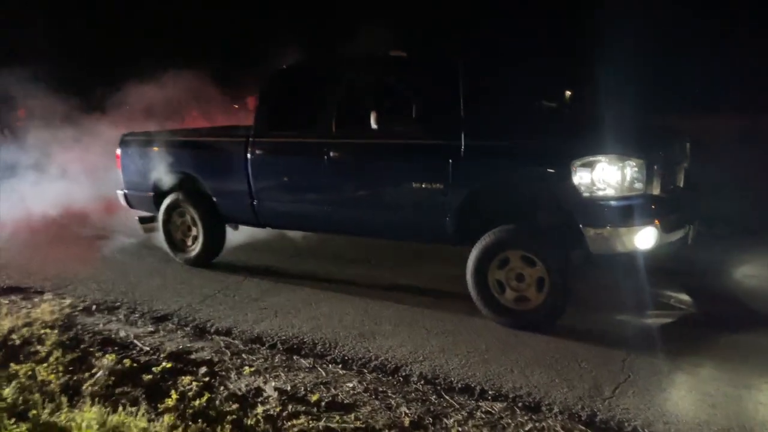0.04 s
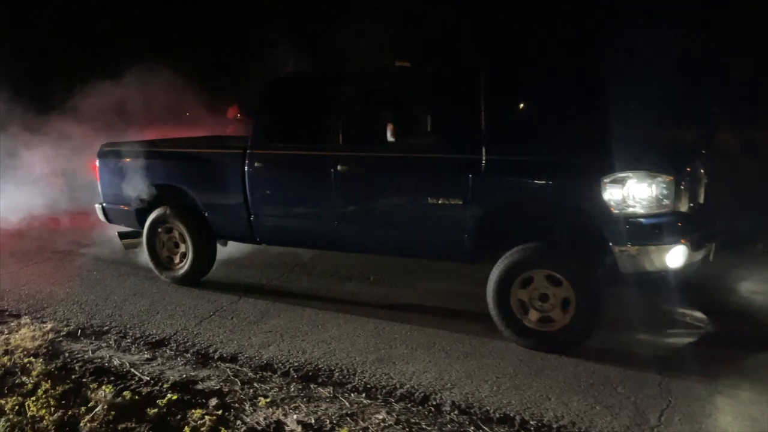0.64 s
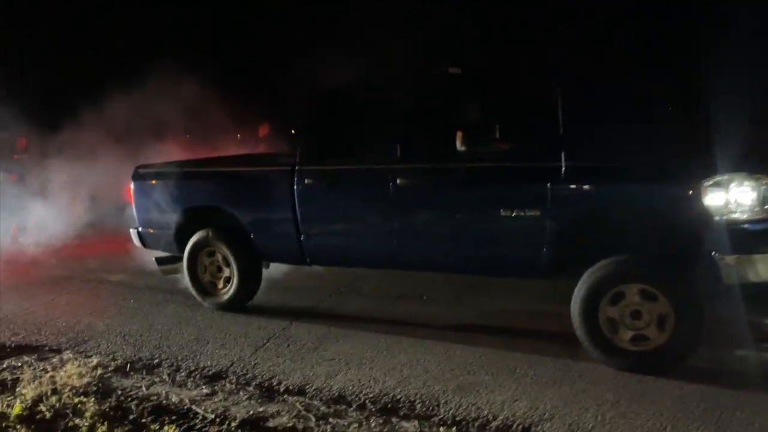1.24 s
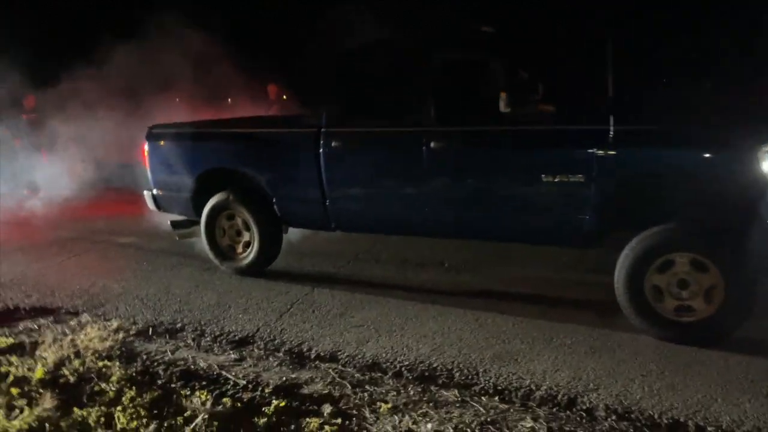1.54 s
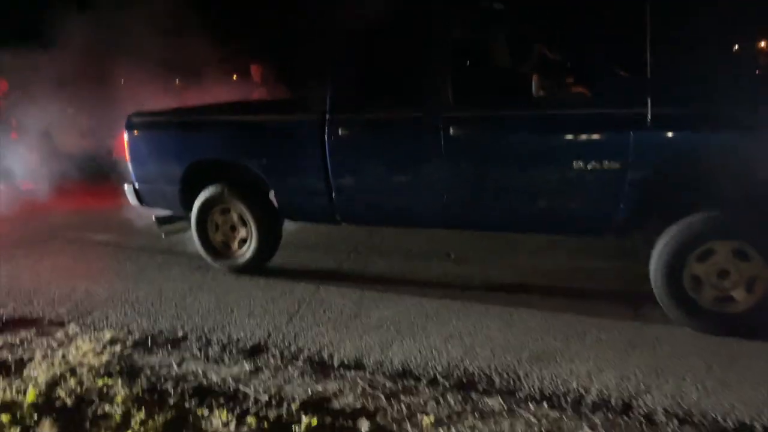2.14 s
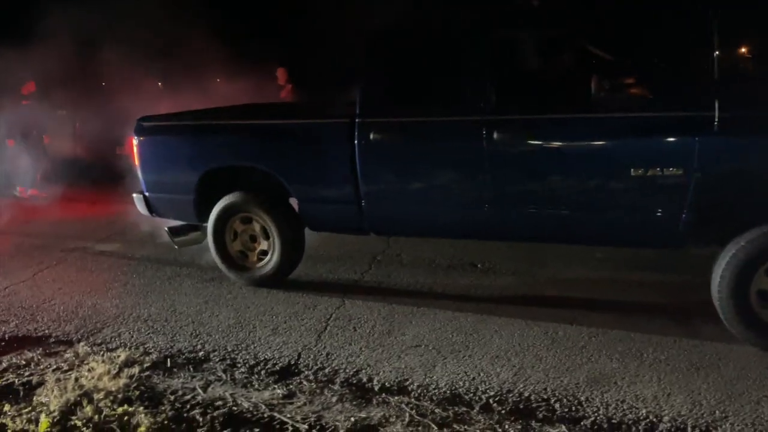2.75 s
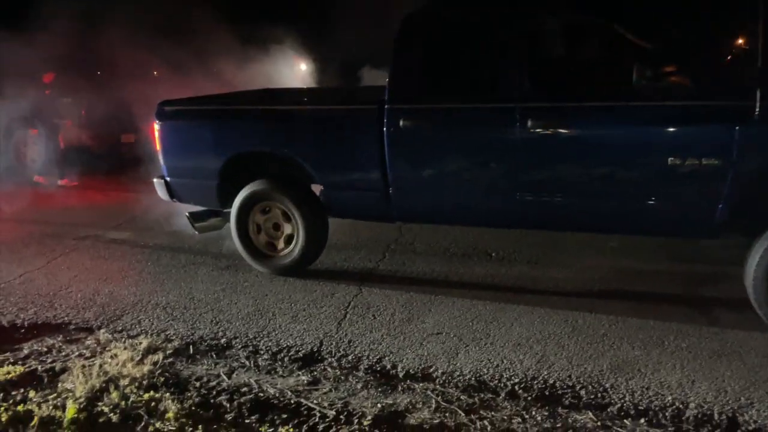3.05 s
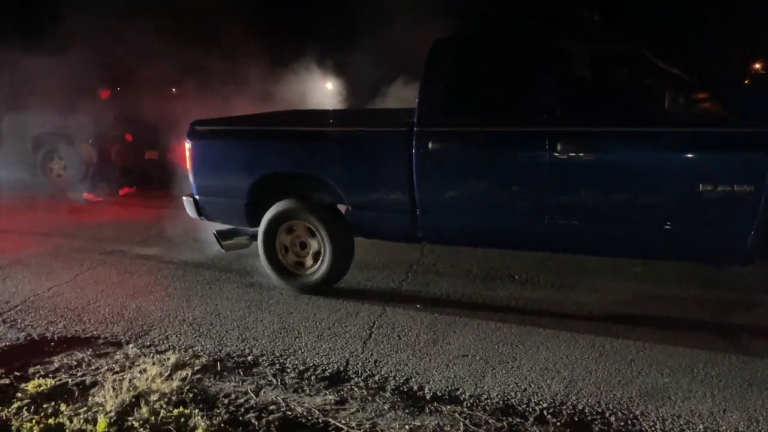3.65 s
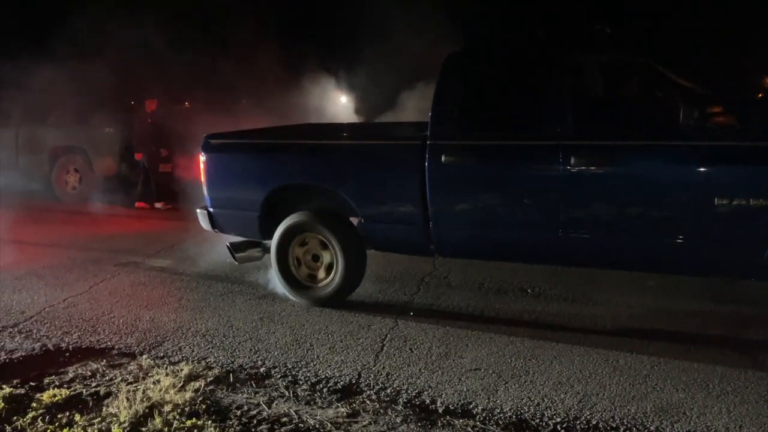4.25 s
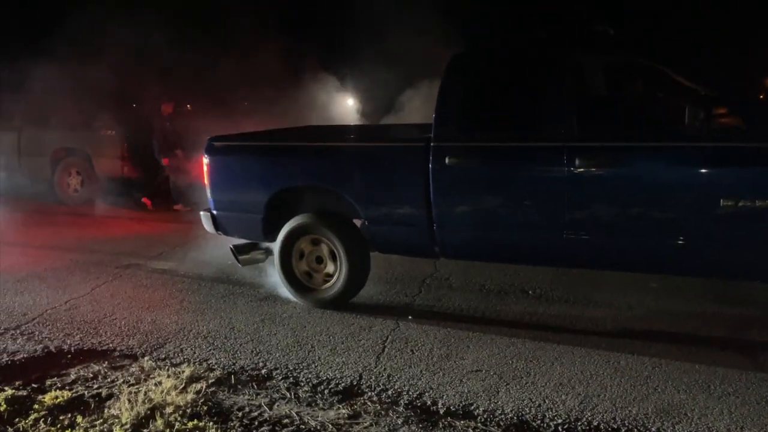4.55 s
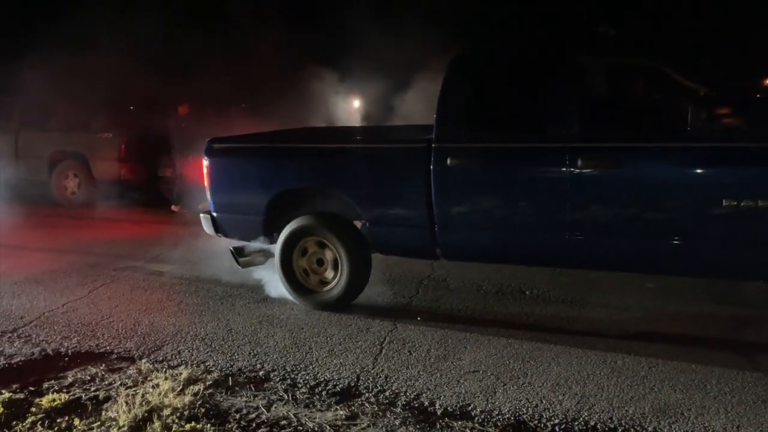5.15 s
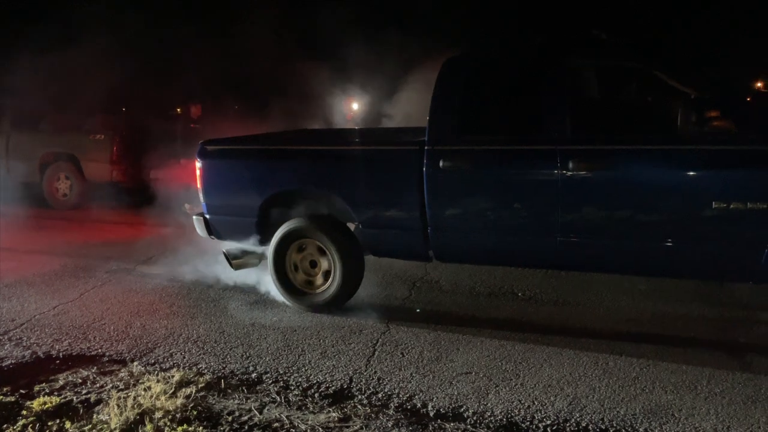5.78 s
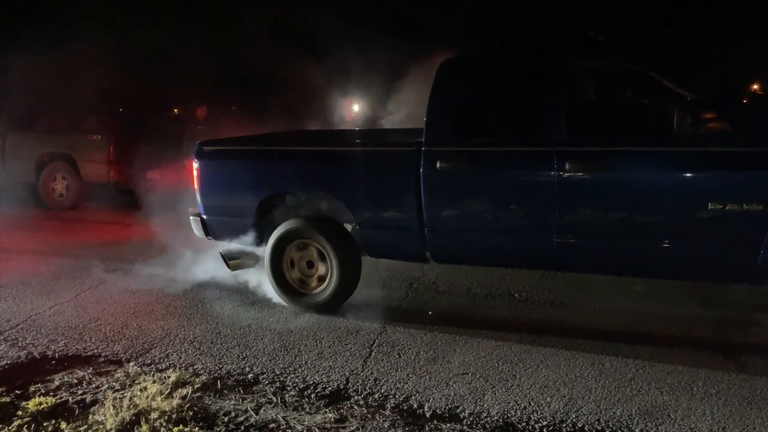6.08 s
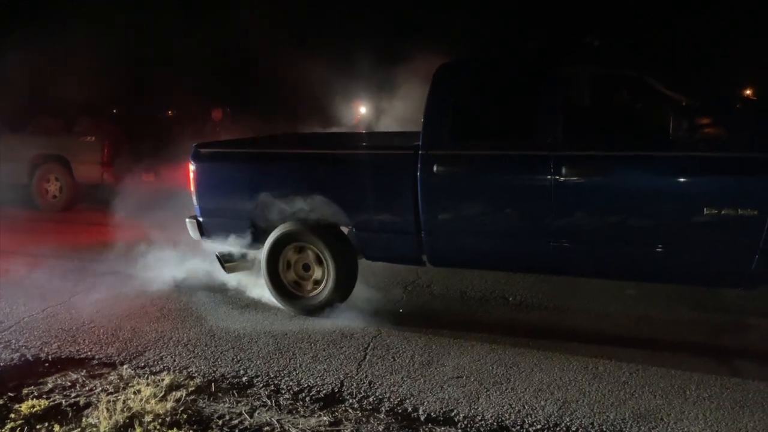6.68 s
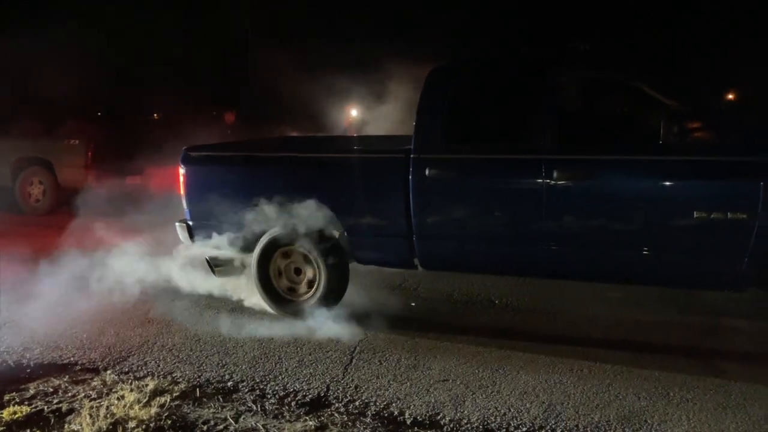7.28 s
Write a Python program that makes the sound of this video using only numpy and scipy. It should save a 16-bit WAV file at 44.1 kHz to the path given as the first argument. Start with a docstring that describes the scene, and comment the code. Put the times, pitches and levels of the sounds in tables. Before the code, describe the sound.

After a low idle, a pickup's engine is floored, climbing to a droning, rasping roar over the hiss of a spinning tyre.

```python
"""V8 pickup spinning a tyre

The engine idles on an asphalt road at night, then is floored and spins a rear tyre in place.
The exhaust drones on the orders (harmonics) of its eight-firing cycle; under load the strongest
firings steepen into cracks. Gas rushes from the tailpipe, the intake whistles, grit crunches,
the tyre hisses, and the road and verge send back short echoes."""
import sys
import numpy as np
from scipy import signal
from scipy.fft import rfft, irfft, next_fast_len
from scipy.io import wavfile
from scipy.ndimage import uniform_filter1d

SR = 44100
rng = np.random.default_rng(int(sys.argv[2]) if len(sys.argv) > 2 else 0)


def to_wav(sig):
    """Store sig (one row per channel, or 1-D mono) as 16-bit WAV at the path in sys.argv[1].

    Samples outside -1..1 are clipped; the rate is SR.
    """
    pcm = np.clip(np.atleast_2d(sig), -1, 1) * 32767
    pcm = np.round(pcm).astype(np.int16)
    wavfile.write(sys.argv[1], SR, pcm.T)  # frames by channels


N = 322812
TIME = np.arange(N) / SR

FLOORED_S = 2.32  # the pedal goes down and stays down
FIRST_FIRING = .025  # cycles
ROUGH_START, ROUGH_SETTLED, SETTLE_S = 1, 0.068, 0.47  # combustion roughness, 0-1

# Relative spectral densities: f/Hz, level/dB
NIGHT_SPECTRUM = [(40, 0), (80, -2.5), (165, -2), (262, -5.5), (385, -21.5), (650, -19), (850, -30),
                  (1300, -29), (2000, -34), (3000, -37.5), (6000, -42.5), (10000, -46), (14000, -57)]  # night ambience
GRIT_SPECTRUM = [(400, 2.5), (700, -3.5), (1000, -5), (1500, -11), (2100, -14), (3000, -17), (5000, -22),
                 (9500, -32), (13000, -34)]  # crunching grit
TYRE_SPECTRUM = [(2200, 6), (3000, -6), (3550, -0.5), (4050, -5), (4900, -2.5), (5600, -8), (6100, -3.5),
                 (7500, -9), (8400, -13), (9300, -3.5), (10100, -10.5), (11800, -18.5), (13500, -25)]  # rubber sliding on asphalt
THUD_SPECTRUM = [(35, -5), (55, 2), (80, -6), (113, -0.5), (173, -2.5), (268, -16), (389, -19), (650, -44),
                 (900, -76)]  # a firing at idle
GAS_SPECTRUM = [(300, -14.5), (620, -2), (760, -8.5), (1000, 0.5), (1250, -5), (1850, -4.5), (2300, -22.5),
                (3000, -18.5), (6000, -37.5)]  # flow from the tailpipe
CRACK_SPECTRUM = [(500, 1.5), (740, -17.5), (815, 7.5), (870, 4), (945, 15.5), (1090, 11), (1170, 4.5),
                  (1480, 7.5), (1850, 11), (2100, -3), (2400, 0), (2900, -33.5), (3500, 0), (4100, -50.5),
                  (9000, -54)]  # body of a crack
SPIT_SPECTRUM = [(2300, 7), (3050, -5), (3520, 18), (4200, 6), (5000, 2.5), (7500, -20.5), (9300, -1.5),
                 (10500, -29), (13500, -24.5)]  # bright edge of a crack
BURBLE_SPECTRUM = [(30, -18), (60, -26.5), (130, -15.5), (250, -2), (420, 5), (610, 3), (750, -24)]  # turbulence on the exhaust pulses
# A pebble snaps under the tyre: t/s, level/dB
PEBBLE_SNAPS = [(1.532, -61)]
# Loose grit gives way: t/s, decay time/s, crunch level/dB, ring f/Hz, ring level/dB
GRIT_CRUNCHES = [(1.272, 0.028, -61, 720, -59), (1.309, 0.044, -58, 3700, -73),
                 (1.352, 0.06, -67, 2110, -69), (1.384, .045, -67, 1830, -67), (1.544, .04, -79, 1050, -67),
                 (1.735, .03, -69, 2900, -80), (1.767, .045, -65, 2400, -77)]
# Whistle of the intake: t/s, f/Hz, level/dB
INTAKE_WHISTLE = [(2.42, 3800, -69), (2.55, 3950, -58), (2.8, 4187, -50.5), (3.1, 4390, -49.5),
                  (3.35, 4800, -43), (3.6, 4925, -49.5), (3.9, 5090, -46.5), (4.6, 5050, -49),
                  (7.32, 5190, -54.5)]
# Engine speed in four-stroke cycles: t/s, f/Hz
CYCLE_RATE = [(0.0, 9.476), (1.0, 8.585), (2.3, 8.05), (2.6, 11.91), (2.9, 16.104), (3.2, 19.259),
              (3.52, 19.351), (4.2, 20.669), (4.72, 21.678), (5.35, 22.138), (5.9, 22.924), (6.5, 24.055),
              (7.32, 26.65)]
# The tyre grips and slips: centre t/s, duration/s, drone level/dB, brightness/dB, gas level/dB
LOAD_SWELLS = [(2.827, 0.09, 7, -3, 2.5), (2.944, 0.13, 4, 2.5, 5), (2.56, 0.078, 1.5, 1, 4),
               (3.079, 0.038, 5, -3, -2.5), (3.336, 0.57, -0.5, 2, 4.5), (4.56, 0.71, -0.6, 2, 5),
               (5.304, 1, -2, 2, 0), (6.833, 0.26, -1.3, 1.05, 2)]
# One firing steepens into a shock: start t/s, end t/s, firing (0-7), crack level/dB, spit level/dB
SHOCKS = [(3.147, 4.322, 1, -8.5, -27), (3.153, 3.7, 4, -3.5, -29), (3.3, 4.7, 6, -3.5, -31),
          (4.314, 4.856, 1, 5, -3.5), (4.405, 5.104, 4, 7.5, 9.5), (4.853, 5.396, 1, 3.5, -15),
          (5.1, 5.805, 4, 6, 13), (5.4, 6.24, 1, 3, 4), (5.796, 7.063, 4, -0.5, -5.5),
          (6.57, 7.014, 1, 4, 12)]
# Single cracks that stand out: t/s, level/dB
LOUD_POPS = [(5.4665, -5.5), (5.4948, -10.5), (5.7335, -8), (6.8538, -9.5)]
# The silencer booms as the revs leap: centre t/s, duration/s, level/dB
SILENCER_BOOMS = [(2.56, 0.11, -15.5), (2.745, 0.14, -14.5)]
# The eight firings of a cycle, whose pattern sets the phases of the orders: level/dB
FIRING_LEVELS = [-7.5, -.5, -8, -7, -.5, -7, -5, -9]
# Harmonics of the cycle rate: order, level/dB at 22 cycles per second, slope with rate/(dB/Hz)
ORDERS = [(3, 5.5, 0.57), (5, 1.9, 0.45), (6, -9, -2.2), (7, -15, -4), (8, 8, 0.39), (9, -11.5, -1),
          (10, -5.5, -2.4), (11, -2.5, 0.8), (12, -20, -0.3), (13, -1.5, 2), (14, -8, -1.9), (15, -20, 2.9),
          (16, -1.4, -1.18), (17, -15.3, 0.8), (18, -14.5, 1.85), (19, -1.05, 0.34), (20, -16.3, 1.5),
          (21, -1.5, 0.46), (22, -9, -0.1), (23, -19.5, 3.6), (24, -8.5, -1.2), (25, -17.5, 0.3),
          (26, -15.5, 2.5), (27, -8.5, -0.5), (29, -10, -0.06), (30, -11.5, 4.5), (32, -7, 2.5),
          (37, -5.5, 3.5), (43, 7, 2.7)]
# Gain of the weak orders, which arise from unequal firing: t/s, level/dB
WEAK_ORDER_GAIN = [(3, -4), (3.4, -3.8), (3.8, -4), (4.65, 1), (4.85, -3), (5.65, -1.5), (5.85, 0),
                   (6.75, 5), (7.05, 1.5)]
# Frequency response of the exhaust pipe: f/Hz, level/dB
PIPE_RESPONSE = [(40, -31), (60, -6), (83, -5.5), (120, -0.35), (170, -2.5), (255, 2), (285, -6.5),
                 (310, 1.5), (335, 4.5), (372, 0.75), (408, 7.5), (435, 2), (468, 5.5), (500, 0.4),
                 (570, 3.5), (650, -0.1), (720, -25)]


def from_db(db):
    """Amplitude ratio of a level in decibels."""
    return 10 ** (np.asarray(db) / 20)


def unit_power(x):
    """Normalisation to a mean square of 1."""
    return x / np.sqrt(np.mean(x ** 2) + 1e-20)


def in_time(rows):
    """Linear interpolation of each column at every sample."""
    times, *columns = np.transpose(rows)
    return [np.interp(TIME, times, column) for column in columns]


def level_at(spectrum, hz):
    """Interpolation of a spectrum on a logarithmic frequency axis."""
    f, db = np.transpose(spectrum)
    return np.interp(np.log(np.maximum(hz, 1)), np.log(f), db)


def drift(rate_hz):
    """Random modulation of unit power: straight lines between Gaussian values."""
    steps = rng.standard_normal(4000)
    return unit_power(np.interp(TIME * rate_hz, np.arange(len(steps)), steps))


def swell(centre_s, length_s):
    """Gaussian envelope of height 1."""
    return np.exp(-np.minimum((2 * (TIME - centre_s) / length_s) ** 2, 50))


def since_floored():
    """Seconds elapsed since the throttle opened."""
    return np.maximum(TIME - FLOORED_S, 0)


def opening(depth_db, rise_s, shape=0.62):
    """Relaxation from -depth_db to 0 dB as the engine takes up the throttle."""
    return -depth_db * np.exp(-(since_floored() / rise_s) ** shape)


def colour(x, spectrum, size=8192):
    """Minimum-phase filtering, falling 20 dB per octave beyond the ends of the spectrum."""
    hz = np.maximum(np.fft.rfftfreq(size, 1 / SR), 1)
    octaves_below = np.maximum(np.log2(spectrum[0][0] / hz), 0)
    octaves_above = np.maximum(np.log2(hz / spectrum[-1][0]), 0)
    cepstrum = irfft(np.log(from_db(level_at(spectrum, hz) - 20 * (octaves_below + octaves_above))))
    # Folding the cepstrum makes the response causal.
    cepstrum[1:size // 2] *= 2
    cepstrum[size // 2 + 1:] = 0
    return signal.oaconvolve(x, irfft(np.exp(rfft(cepstrum))))[:N]


def noise(spectrum):
    """Filtered Gaussian noise of unit power."""
    return unit_power(colour(rng.standard_normal(N), spectrum))


def narrow_band(hz, half_width_hz):
    """Modulation shifts low-pass noise into a band around a moving centre frequency."""
    band = signal.sosfilt(signal.butter(2, half_width_hz, fs=SR, output="sos"), rng.standard_normal(N))
    return unit_power(band * np.cos(2 * np.pi * np.cumsum(hz) / SR))


def pulses(at, db):
    """Impulse train with the given sample positions and levels."""
    out = np.zeros(N)
    out[at] = from_db(db)
    return out


def burst_after(clicks, decay_s):
    """Exponentially decaying noise behind each impulse, of equal energy on average."""
    pole = np.exp(-1 / (decay_s * SR))
    return signal.lfilter([np.sqrt(1 - pole ** 2)], [1, -pole], clicks + 1e-18) * rng.standard_normal(N)


def delayed(x, ms):
    """Linear phase gives a delay of any fraction of a sample."""
    size = next_fast_len(N + SR // 4)
    turns = np.fft.rfftfreq(size, 1 / SR) * ms / 1000
    return irfft(rfft(x, size) * np.exp(-2j * np.pi * turns), size)[:N]


def dispersed(x, lead_ms=0.913, spread_ms=5, knee_hz=950):
    """Dispersion: treble runs ahead and bass trails, so each crack falls in pitch."""
    size = next_fast_len(N + SR // 4)
    hz = np.fft.rfftfreq(size, 1 / SR)
    turns = (spread_ms * knee_hz * (1 - np.exp(-hz / knee_hz)) - lead_ms * hz) / 1000
    return irfft(rfft(x, size) * np.exp(-2j * np.pi * turns), size)[:N]


def place(x, pan_db, right_lag_ms):
    """Stereo position by differences of level (left minus right) and arrival time."""
    return np.array([x * from_db(pan_db / 2), delayed(x, right_lag_ms) * from_db(-pan_db / 2)])


def grainy_field(spectrum, grain_db, diffuse, lag_ms):
    """Randomly modulated noise: a direct wave plus a diffuse field, uncorrelated between channels."""
    grains = [rng.standard_normal(N) * from_db(grain_db * drift(400)) for _ in range(3)]
    direct, *scattered = [unit_power(colour(x, spectrum)) for x in grains]
    return place(direct, pan_db=-3.5, right_lag_ms=lag_ms) + diffuse * np.array(scattered)


def night():
    """Ambient noise: a faint, partly diffuse rumble."""
    return from_db(-55) * grainy_field(NIGHT_SPECTRUM, grain_db=2.0, diffuse=0.64, lag_ms=-0.065)


def pebble(t60_s=0.022):
    """A snapping stone is a damped transient: one short, bright tick."""
    envelope = sum(from_db(db - 60 * np.maximum(TIME - s, 0) / t60_s) * (TIME > s)
                   for s, db in PEBBLE_SNAPS)
    return envelope * noise([(5000, -20), (10000, 0), (13500, -12)])


def crunches(attack_s=.012, fall_octaves_per_s=4):
    """Grit yields quickly and decays exponentially, each time with a narrow ring that slides down."""
    grit = grainy_field(GRIT_SPECTRUM, grain_db=1.0, diffuse=0.89, lag_ms=0.11)
    out = 0
    for s, decay_s, db, hz, ring_db in GRIT_CRUNCHES:
        age = np.clip(TIME - s, 0, 1)
        envelope = np.where(TIME < s, swell(s, 2 * attack_s), np.exp(-age / decay_s))
        ring = narrow_band(hz * 2 ** (-fall_octaves_per_s * age), half_width_hz=140)
        out = out + envelope * (from_db(db) * grit + from_db(ring_db) * ring)
    return out


def tyre():
    """Sliding friction on asphalt hisses, most fiercely as the tyre breaks loose."""
    breakaway_db = 3.5 * swell(3.36, 0.9)
    db = -45 + opening(depth_db=46.5, rise_s=0.15, shape=0.97) + breakaway_db
    return from_db(db) * grainy_field(TYRE_SPECTRUM, grain_db=3.0, diffuse=0.84, lag_ms=0.2504)


def intake():
    """Flow noise: a whistling band climbs and broadens into a hiss as the engine draws harder."""
    hz, db = in_time(INTAKE_WHISTLE)
    whistle = narrow_band(hz, half_width_hz=160)
    hiss = narrow_band(hz, half_width_hz=370)
    hiss_share = np.interp(TIME, [2.85, 3.3], [0, 1])
    return from_db(db) * (np.sqrt(1 - hiss_share) * whistle + np.sqrt(hiss_share) * hiss)


def verge(x, t60_s=0.023, gap_s=.004, echo_db=-10.5):
    """Scattering from grass and nearby vehicles returns a short, diffuse echo."""
    t = TIME[:SR // 3]
    tails = rng.standard_normal((2, len(t))) * from_db(-60 * t / t60_s) * (t > gap_s)
    return from_db(echo_db) * np.array([signal.oaconvolve(x, h / np.linalg.norm(h))[:N] for h in tails])


def firings(cycle):
    """Eight firings evenly divide the four-stroke cycle: the sample and number (0-7) of each."""
    count = np.floor((cycle - FIRST_FIRING) * len(FIRING_LEVELS)).astype(int)
    at = np.flatnonzero(np.diff(count)) + 1
    return at, count[at] % len(FIRING_LEVELS)


def idle_tones(cycle, order=12, whine_hz=2005):
    """Pure tones while the idle is high: one order hums in the silencer and an accessory whines."""
    hum = from_db(-52) * swell(0.12, 1.0) * np.sin(2 * np.pi * order * cycle)
    whine = from_db(-79) * swell(.05, 0.74) * np.sin(2 * np.pi * whine_hz * TIME)
    return hum + whine


def idle(cycle, uneven_db=3, far_bank_db=-15, hunt_db=3.5, hunt_period_s=1.94):
    """Impulse excitation: every second firing thuds through the silencer; the level hunts slowly."""
    at, firing = firings(cycle)
    clicks = pulses(at, far_bank_db * (firing % 2 == 0) + uneven_db * rng.standard_normal(len(at)))
    thuds = colour(delayed(clicks, ms=4), THUD_SPECTRUM)
    local_power = uniform_filter1d(uniform_filter1d(thuds ** 2, SR // 7), SR // 7)
    level_db = -52.5 + hunt_db * np.cos(2 * np.pi * TIME / hunt_period_s)
    return from_db(level_db) * thuds / np.sqrt(np.abs(local_power) + 1e-12)


def load(sag_db_per_s=0.876):
    """Engine load sets drone gain, brightness and gas gain (dB): first throttle, then tyre grip."""
    drone_db, bright_db, gas_db = sum(np.outer(changes, swell(s, length))
                                      for s, length, *changes in LOAD_SWELLS)
    drone_db += -20 + opening(depth_db=34.0, rise_s=0.12) - sag_db_per_s * since_floored()
    bright_db += opening(depth_db=13.5, rise_s=0.29, shape=1.8)
    gas_db += -31 + opening(depth_db=52.5, rise_s=0.26, shape=0.94) + 0.03 * since_floored()
    return drone_db, bright_db, gas_db


def lope(cycle):
    """Modulation (dB) at the cycle rate while one firing briefly dominates."""
    return 1.9 * swell(4.0, 1.1) * np.cos(2 * np.pi * (cycle - .2))


def gas(cycle, rough, puff_db=3, size=2048):
    """Pulsating flow, a puff per firing: turbulent in a ragged burn, then largely periodic."""
    wavelets = np.interp(cycle, np.arange(size) / size, rng.standard_normal(size), period=1)
    periodic = unit_power(colour(wavelets, GAS_SPECTRUM))
    turbulence = 8 * rough
    flow = (periodic + turbulence * noise(GAS_SPECTRUM)) / np.hypot(1, turbulence)
    puffs = from_db(puff_db * np.cos(2 * np.pi * (len(FIRING_LEVELS) * cycle - .45)))
    return unit_power(flow * puffs)


def shock_fronts(cycle, spells, uneven_db, weak_db, fade_s=.07):
    """Nonlinear steepening: an impulse per firing, reinforced during that firing's spells."""
    at, firing = firings(cycle)
    gain = from_db(weak_db + opening(depth_db=50.5, rise_s=0.4)[at])
    for start, end, steep_firing, db in spells:
        inside = (np.tanh((TIME[at] - start) / fade_s) - np.tanh((TIME[at] - end) / fade_s)) / 2
        gain = gain + from_db(db) * inside * (firing == steep_firing)
    return pulses(at, 20 * np.log10(gain) + uneven_db * rng.standard_normal(len(at)))


def cracks(cycle, level_db=-30.5):
    """Shock fronts leave the tailpipe, tear the air behind them and reflect from the road."""
    spells = [(start, end, firing, db) for start, end, firing, db, _ in SHOCKS]
    fronts = shock_fronts(cycle, spells, uneven_db=.8, weak_db=-15)
    tearing = .22 * burst_after(fronts, decay_s=.002)
    road_echo = 0.12 * delayed(fronts, ms=1.42)
    return from_db(level_db) * unit_power(colour(dispersed(fronts + tearing + road_echo), CRACK_SPECTRUM))


def spit(cycle, level_db=-45):
    """The treble of each shock front: a sharp snap and a brief, random burst of gas."""
    spells = [(start, end, firing, db) for start, end, firing, _, db in SHOCKS]
    fronts = shock_fronts(cycle, spells, uneven_db=3, weak_db=-32)
    snaps = .55 * fronts + burst_after(fronts, decay_s=0.0013)
    return from_db(level_db) * unit_power(colour(dispersed(snaps), SPIT_SPECTRUM))


def pops():
    """The hardest cracks excite the resonances of the tailpipe's tip."""
    times, db = np.transpose(LOUD_POPS)
    snaps = pulses((times * SR).astype(int), db)
    return colour(snaps + 1.6 * burst_after(snaps, decay_s=0.00095), SPIT_SPECTRUM)


def boom(cycle, order=5):
    """Cavity resonance: a low order swells in the silencer as the revs leap."""
    envelope = sum(from_db(db) * swell(s, length) for s, length, db in SILENCER_BOOMS)
    return envelope * np.sin(2 * np.pi * order * cycle)


def burble(tones, rough):
    """Turbulence rides on the pressure pulses and fills the gaps between the spectral lines."""
    pressure = np.sqrt(np.abs(uniform_filter1d(tones ** 2, size=500)))
    gain = from_db(-7 + opening(depth_db=16.0, rise_s=0.23, shape=2.9))
    return gain * (rough + .035) * pressure * noise(BURBLE_SPECTRUM)


def slack(hz, at_s=6.87, fade_s=0.27, depth_db=9, above_hz=338):
    """Attenuation (dB) of the upper orders as the load slackens near the end."""
    slackened = (1 + np.tanh((TIME - at_s) / fade_s)) / 2
    upper = (1 + np.tanh((hz - above_hz) / 20)) / 2
    return depth_db * slackened * upper


def pipe_phase(hz, bass_hz=455, round_trip_s=.0066, reflection=-.62):
    """Phase shift (rad): the silencer delays the bass, resonances ring, the open end inverts an echo."""
    silencer = 14.5 * np.exp(-hz / bass_hz)
    resonances = .09 * (level_at(PIPE_RESPONSE, hz * 1.04) - level_at(PIPE_RESPONSE, hz / 1.04))
    open_end = np.angle(1 + reflection * np.exp(-2j * np.pi * hz * round_trip_s))
    return silencer + resonances + open_end


def drone(cycle_hz, cycle, rough, load_db, bright_db, knee_hz=300, pipe_delay_s=.0011):
    """Periodic firing gives a harmonic series, filtered by the pipe and modulated by rough burning."""
    firing_phases = np.angle(np.fft.fft(from_db(FIRING_LEVELS)))
    arrival = cycle - FIRST_FIRING - cycle_hz * pipe_delay_s
    imbalance_db, = in_time(WEAK_ORDER_GAIN)
    rate_offset_hz = np.maximum(cycle_hz, 19) - 22
    tones = np.zeros(N)
    for order, db, db_per_hz in ORDERS:
        hz = order * cycle_hz
        weak = order % 8 not in (0, 3, 5)
        db = db + db_per_hz * rate_offset_hz + weak * imbalance_db
        db += 1.5 * np.minimum(hz / 455, 1) ** 2 * drift(6.3)  # tyre slip sways the upper orders
        db -= 6 * max(order - 30, 0) * (rough - ROUGH_SETTLED)  # the highest need a settled burn
        db += level_at(PIPE_RESPONSE, hz) - slack(hz)
        db += bright_db * np.log2(1 + (hz / knee_hz) ** 2)
        shake = rough * np.minimum(hz / knee_hz, 1.5) * drift(30)
        phase = 2 * np.pi * order * arrival + firing_phases[order % 8] + pipe_phase(hz)
        tones += from_db(db) * (1 + .5 * shake) * np.cos(phase + 1.7 * shake)
    # While the burn is ragged, whole firings come out strong or weak.
    tones *= from_db(load_db + 2.5 * rough * drift(110))
    return tones + burble(tones, rough)


def scene():
    """Superposition: one crank phase times the exhaust, over intake, tyre, grit and night air."""
    cycle_hz, = in_time(CYCLE_RATE)
    cycle = np.cumsum(cycle_hz) / SR + .004 * drift(6)  # the crank runs a little ahead and behind
    drone_db, bright_db, gas_db = load()
    lope_db = lope(cycle)
    rough = ROUGH_SETTLED + (ROUGH_START - ROUGH_SETTLED) * np.exp(-since_floored() / SETTLE_S)
    throttle = np.clip(since_floored() / 0.02, 0, 1)
    idling = 1 - np.clip(since_floored() / 0.32, 0, 1)
    rushing = np.clip((since_floored() - 0.089) / 0.12, 0, 1)  # air and tyre set in a moment later

    low = throttle * (drone(cycle_hz, cycle, rough, drone_db, bright_db + lope_db) + boom(cycle))
    low += idling * (idle(cycle) + idle_tones(cycle))
    flow = from_db(gas_db + 2 * lope_db) * gas(cycle, rough)
    rasp = throttle * (flow + cracks(cycle) + spit(cycle) + pops())
    exhaust = place(low, pan_db=-3.5, right_lag_ms=-0.12)
    exhaust += place(rasp, pan_db=-3.0, right_lag_ms=0.13) + verge(rasp)
    air = np.array([intake(), intake()])
    return night() + rushing * (tyre() + air) + crunches() + pebble() + exhaust


def record(dry, low_hz=40, top_hz=13800, ceiling=.97):
    """Band limiting and soft saturation: deep bass is shed, peaks are rounded, the top is cut steeply."""
    thin = signal.sosfilt(signal.butter(4, low_hz, "high", fs=SR, output="sos"), dry)
    rounded = thin / (1 + (np.abs(thin) / ceiling) ** 8) ** (1 / 8)
    return signal.sosfilt(signal.ellip(10, .1, 80, top_hz, fs=SR, output="sos"), rounded)


dry = scene()
out = record(dry)
to_wav(out)
```